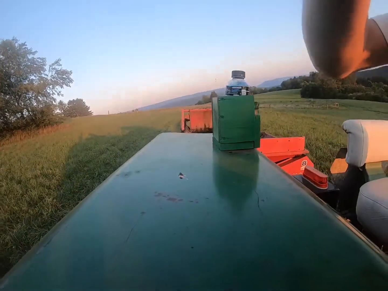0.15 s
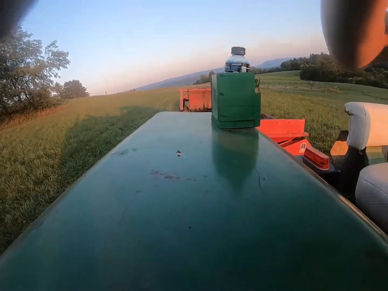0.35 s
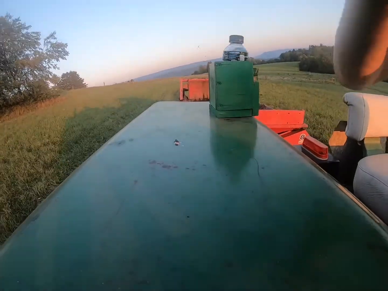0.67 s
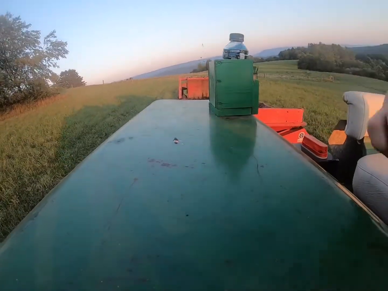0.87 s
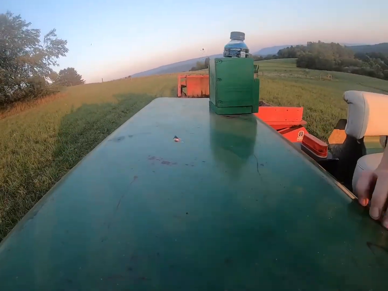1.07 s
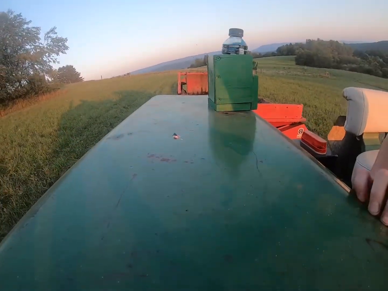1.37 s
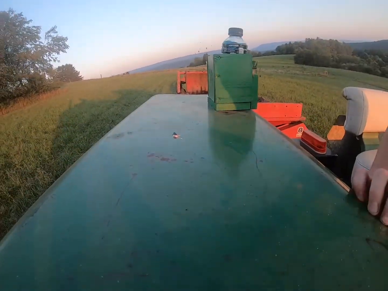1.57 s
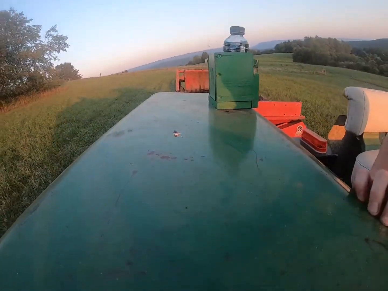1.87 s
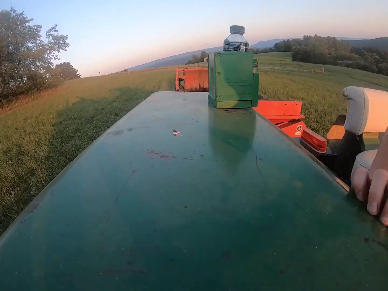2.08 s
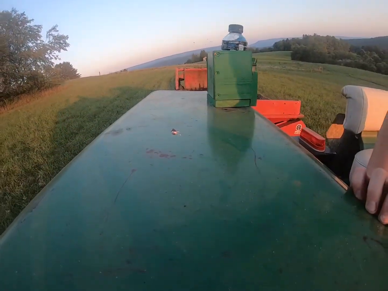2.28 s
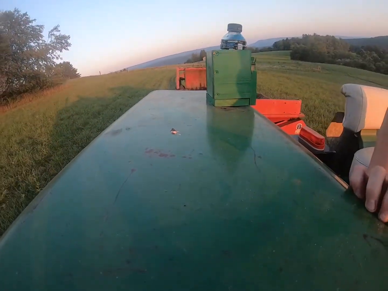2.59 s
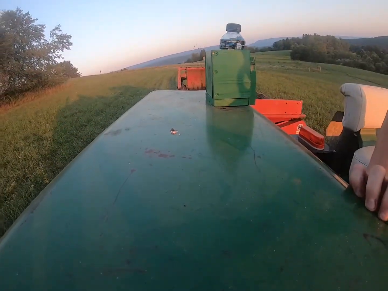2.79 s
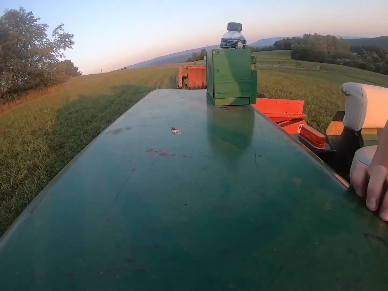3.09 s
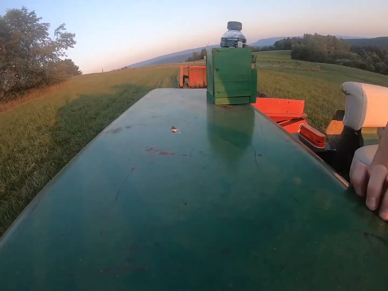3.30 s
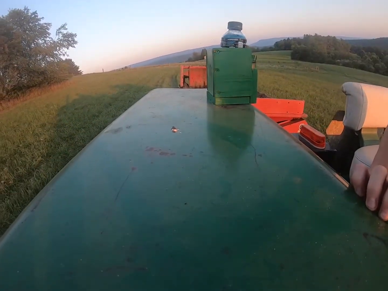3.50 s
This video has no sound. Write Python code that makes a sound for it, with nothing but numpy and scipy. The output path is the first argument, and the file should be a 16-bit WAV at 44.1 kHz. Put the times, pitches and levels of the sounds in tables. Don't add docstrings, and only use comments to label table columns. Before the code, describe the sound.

Close, loud tractor engine at constant working speed, humming and rattling throughout; in the first second a hand near the microphone colours the treble, knocks it softly twice, then withdraws.

```python
import sys
import numpy as np
from scipy import signal
from scipy.fft import rfft, irfft, next_fast_len
from scipy.io import wavfile

SR = 44100
rng = np.random.default_rng(int(sys.argv[2]) if len(sys.argv) > 2 else 0)


def rack_gain(trim_db):
    fader = np.asarray(trim_db, float)
    return 10 ** (fader / 20)


def store_wav(level_fs):
    pcm = np.round(np.clip(np.atleast_2d(level_fs), -1, 1) * 32767)
    wavfile.write(sys.argv[1], SR, pcm.T.astype(np.int16))


N = 160965


def at_hz(points, hz, axis=1):
    points = np.array(points)
    return np.interp(np.log(hz + 1), np.log(points[:, 0]), points[:, axis])


def in_time(rows):
    seconds, *columns = np.transpose(rows)
    return [np.interp(np.arange(N) / SR, seconds, column) for column in columns]


def drift(rate_hz):
    r = np.exp(-80 * np.pi * rate_hz / SR)
    noise = rng.standard_normal(N // 40 + 2002)
    slow = signal.lfilter([1], [1, -2 * r, r * r], noise)[2000:]
    return np.interp(np.arange(N) / 40, np.arange(len(slow)), slow / slow.std())


def colour(x, gain):
    size = next_fast_len(N)
    return irfft(rfft(x, size) * gain(np.fft.rfftfreq(size, 1 / SR)), size)[..., :N]


def band(x, edges_hz):
    return signal.sosfilt(signal.butter(2, edges_hz, "band", fs=SR, output="sos"), x)


# (time [s], firing rate [Hz], exhaust boom level [dB])
SPEED = [(0.1, 79.21, -13.5), (0.41, 79.62, -14), (0.73, 78.9, -13), (1.04, 79.03, -13.5),
         (1.35, 79.39, -13.8), (1.67, 79.72, -13), (1.98, 79.61, -14), (2.3, 79.34, -13),
         (2.61, 79.51, -13.5), (2.92, 79.42, -13.5), (3.24, 79.33, -13.5), (3.55, 79.32, -13.5)]


def crank():
    first_firing_s = .004
    firing_hz, boom_db = in_time(SPEED)
    firings = np.cumsum(firing_hz) / SR - first_firing_s * firing_hz[0]
    return firings / 6, boom_db


# (time [s], left cupping [0-1], right cupping [0-1])
HAND = [
    (0, 0.9, 0.86),
    (.3, 0.55, 0.65),
    (.45, 0.67, 0.35),
    (.73, 0.63, 0.23),
    (.79, 0.2, 0.17),
    (.95, 0.09, 0),
]


def hand_cupping():
    return in_time(HAND)


def exhaust_boom(cycles, boom_db):
    waver_db = .22 * drift(11)
    return rack_gain(boom_db + waver_db) * np.cos(2 * np.pi * 6 * cycles)


def fan(cycles):
    blade_hz, level_db, waver_db = 195.3, -35.5, 2.0
    turns = blade_hz * cycles / cycles[-1] * N / SR
    return rack_gain(level_db + waver_db * drift(2.1)) * np.cos(2 * np.pi * turns)


def late(hz):
    detour_s, detour_from_hz, inverted_s, inverted_share = .00047, 820, .00014, .8
    high = 1 / (1 + (detour_from_hz / (hz + 1)) ** 4)
    detour = np.exp(-2j * np.pi * hz * detour_s)
    inverted = inverted_share * np.exp(-2j * np.pi * hz * inverted_s)
    paths = 1 - high + high * (detour - inverted)
    return paths / (np.abs(paths) + 1e-9)


def tone_wavers():
    waver_db, waver_hz = 2.0, 3
    return [rack_gain(waver_db * drift(waver_hz)) for _ in range(11)]


def order_tone(cycles, order, spread, waver):
    multiple, left_db, right_db = order
    lined_up_at = .39
    hz = multiple * cycles[-1] * SR / N
    turns = multiple * (cycles - lined_up_at) + spread * rng.random()
    tone = waver * np.exp(2j * np.pi * turns)
    return np.array([rack_gain(left_db) * (tone * late(hz)).real, rack_gain(right_db) * tone.real])


# (multiple of the cycle rate [1], left level [dB], right level [dB])
BLOCK_ORDERS = [(3, -46, -49), (4, -45, -45), (5, -44, -45), (8, -37, -36), (9, -32, -32), (10, -39, -34),
                (12, -37, -33), (14, -43, -41), (15, -41, -42), (17, -41, -42), (18, -40, -39),
                (24, -45, -44), (26, -42, -42), (27, -41, -40), (28, -36, -36), (31, -41, -40),
                (32, -38, -37), (34, -41, -40), (39, -45, -43), (41, -44, -42), (44, -46, -44),
                (50, -47, -43), (57, -49, -42)]


def block_tones(cycles, wavers):
    out = np.zeros((2, N))
    for k, order in enumerate(BLOCK_ORDERS):
        spread = .35 if 24 <= order[0] <= 44 else 1
        out += order_tone(cycles, order, spread, wavers[k % 11])
    return out


# (multiple of the cycle rate [1], left level [dB], right level [dB])
GEAR_ORDERS = [(66, -42, -39), (68, -60, -40), (70, -56, -36), (71, -49, -33), (72, -52, -38),
               (73, -54, -37), (75, -53, -34), (76, -43, -42), (77, -61, -37), (78, -57, -34),
               (79, -62, -37), (80, -49, -38), (83, -62, -40), (85, -59, -41), (88, -50, -41),
               (90, -59, -40), (92, -54, -40), (94, -49, -38), (97, -47, -37), (100, -37, -33),
               (104, -56, -42), (119, -61, -42), (120, -48, -40), (132, -60, -40), (142, -60, -44)]
HAND_DAMPS_DB = [
    [-9],
    [-2],
]


def gear_tones(cycles, wavers, left_cup):
    out = np.zeros((2, N))
    for k, order in enumerate(GEAR_ORDERS, len(BLOCK_ORDERS)):
        out += order_tone(cycles, order, 1, wavers[k % 11])
    return out * rack_gain(np.array(HAND_DAMPS_DB) * left_cup)


FIRING_DB = [1.16, -1.5, 0.87, -0.4, -0.62, -0.99]


def firing_swell(cycles):
    depth_db, flicker_db, flicker_hz = .88, .6, 14
    cylinder_db = np.interp(cycles % 1 * 6, np.arange(7), [*FIRING_DB, FIRING_DB[0]])
    pulse_db = depth_db * np.cos(2 * np.pi * 6 * cycles)
    return rack_gain(cylinder_db + pulse_db + flicker_db * drift(flicker_hz))


# (frequency [Hz], level [dB per Hz])
BODY = [(25, -63), (130, -52), (290, -57.5), (650, -58.5), (1500, -58), (2900, -63), (3900, -70.5),
        (10000, -76)]
# (frequency [Hz], width [Hz], lift [dB])
PANELS = [(464, 250, 4), (613, 100, -1.5), (850, 89, 0.5), (917, 260, 7.5), (1315, 180, 6.5), (1626, 17, 2),
          (2145, 39, 7), (2787, 50, 5), (4830, 54, 6.5), (7500, 84, 4)]


def body(hz):
    lift_db = sum(db / (1 + (2 * (hz - f) / width) ** 2) for f, width, db in PANELS)
    return rack_gain(at_hz(BODY, hz) + lift_db) * np.sqrt(SR / 2)


# (frequency [Hz], share [0-1])
REPEATS = [(100, .15), (500, .4), (700, .55), (1400, .5), (2200, .35), (3300, .03)]


def clatter(cycles):
    renewal_per_s = .25
    size = int(N / cycles[-1])
    place = (cycles % 1 * size).astype(int)
    pattern = rng.standard_normal((2, size))[:, place]
    turn = 2 * np.pi * renewal_per_s * np.arange(N) / SR
    looped = np.cos(turn) * pattern[0] + np.sin(turn) * pattern[1]
    fresh = rng.standard_normal(N)
    swell = firing_swell(cycles)

    def share(hz):
        return np.clip(at_hz(REPEATS, hz), 0, 1)

    repeating = colour(swell * looped, lambda hz: body(hz) * np.sqrt(share(hz)))
    return repeating + colour(swell * fresh, lambda hz: body(hz) * np.sqrt(1 - share(hz)))


def cupped(hz):
    low_hz, high_hz, lag_s = 1400, 5600, .00007
    edges = (1 + (low_hz / (hz + 1)) ** 10) * (1 + (hz / high_hz) ** 6)
    return np.exp(-2j * np.pi * hz * lag_s) / np.sqrt(edges)


# (frequency [Hz], level [dB], likeness to the near port [0-1])
SHADE = [(100, -4.7, 0.32), (397, 0.2, 0.81), (715, -5, 0.3), (1040, -14.5, 0), (1300, -5.5, 0),
         (1420, -14, 0), (4570, -6, 0.06), (10000, -6.5, 0.04)]


def ports(near, stray, left_cup, right_cup):
    def shade(hz):
        return rack_gain(at_hz(SHADE, hz))

    def alike(hz):
        return np.clip(at_hz(SHADE, hz, axis=2), 0, 1)

    left = colour(near, lambda hz: shade(hz) * np.sqrt(alike(hz)) * late(hz))
    left += colour(stray, lambda hz: shade(hz) * np.sqrt(1 - alike(hz)))
    left_hand = rack_gain(1) * colour(near, cupped) + rack_gain(1.5) * band(stray, (8500, 12500))
    right_hand = rack_gain(7.5) * band(near, (5470, 8060)) + rack_gain(4.5) * band(stray, (4040, 5500))
    return np.array([left + left_cup * left_hand, near + right_cup * right_hand])


# (time [s], peak level [dB], ring [Hz], left minus right [dB])
TAPS = [
    (.3075, -11, 1200, 6),
    (.582, -22, 1300, 8),
]


def taps():
    rise_s, t60_s = .002, .018
    out = np.zeros((2, N))
    t = np.arange(SR // 10) / SR
    for start_s, db, hz, pan_db in TAPS:
        envelope = rack_gain(db - 60 * t / t60_s) * np.minimum(t / rise_s, 1)
        knock = envelope * np.sin(2 * np.pi * hz * t)
        start = int(start_s * SR)
        out[:, start:start + len(t)] += knock * rack_gain(np.array([[.5], [-.5]]) * pan_db)
    return out


def scene():
    cycles, boom_db = crank()
    left_cup, right_cup = hand_cupping()
    wavers = tone_wavers()
    tones = exhaust_boom(cycles, boom_db) + fan(cycles) + block_tones(cycles, wavers)
    tones = tones + gear_tones(cycles, wavers, left_cup)
    noise = ports(clatter(cycles), clatter(cycles), left_cup, right_cup)
    return np.sqrt(2) * tones + noise + taps()


def microphone_treble(hz):
    shelf_db = -13.5 / (1 + np.exp((10500 - hz) / 310))
    dip_db = -13 / (1 + ((hz - 11350) / 300) ** 2)
    slope_db = -3.5 * np.maximum(hz - 12000, 0) / 1000
    return rack_gain(shelf_db + dip_db + slope_db)


def top_cut(x):
    return signal.sosfilt(signal.butter(12, 15030, fs=SR, output="sos"), x)


def record(dry):
    rounding_top, offset = 1.3, .003
    rounded = rounding_top * np.tanh(dry / rounding_top)
    mix = colour(rounded, microphone_treble) + offset
    return top_cut(mix)


dry = scene()
out = record(dry)
store_wav(out)
```